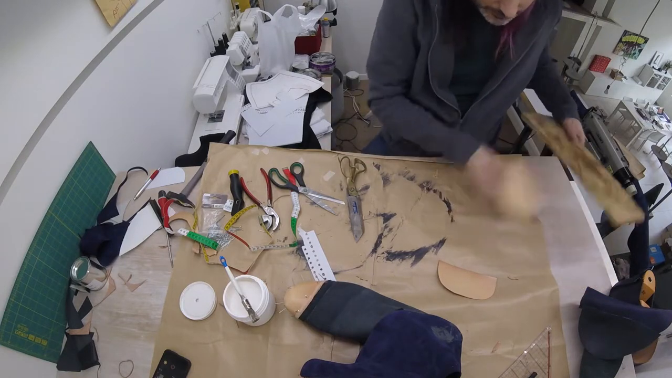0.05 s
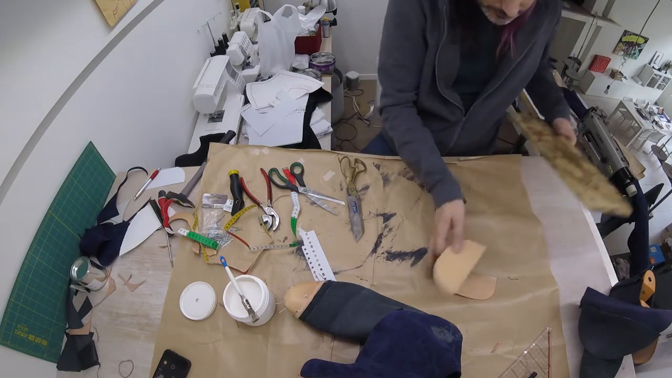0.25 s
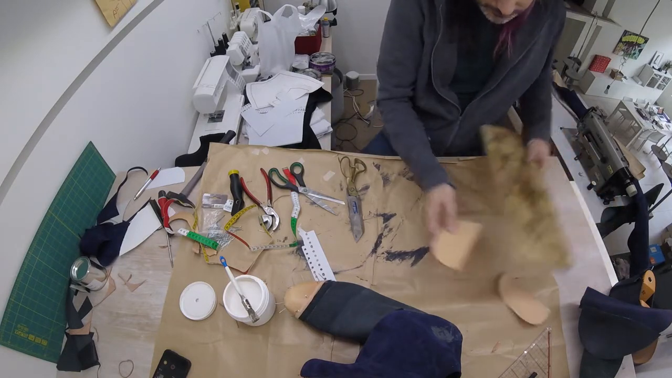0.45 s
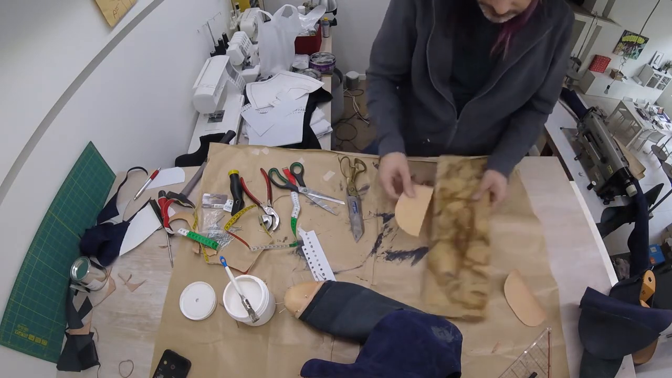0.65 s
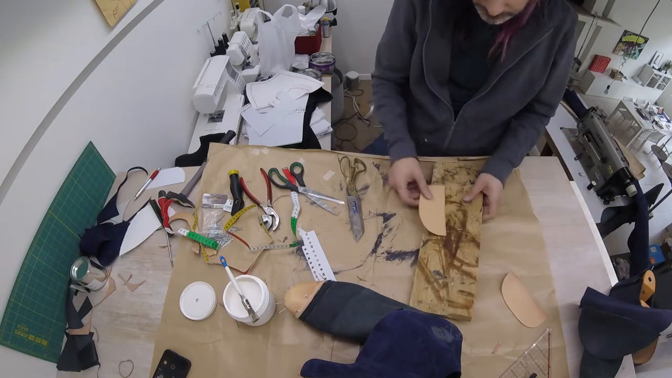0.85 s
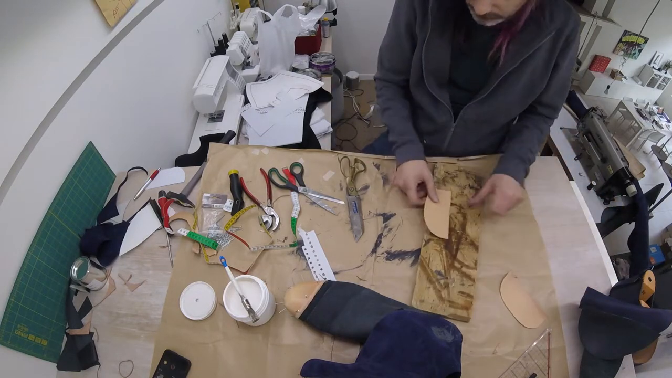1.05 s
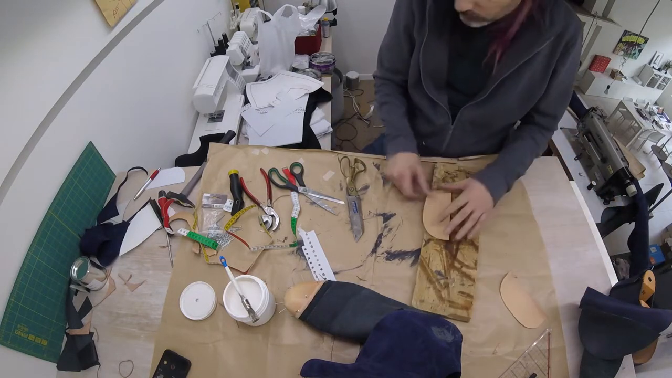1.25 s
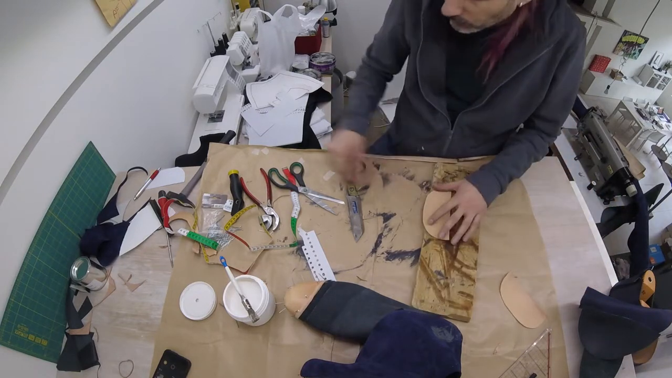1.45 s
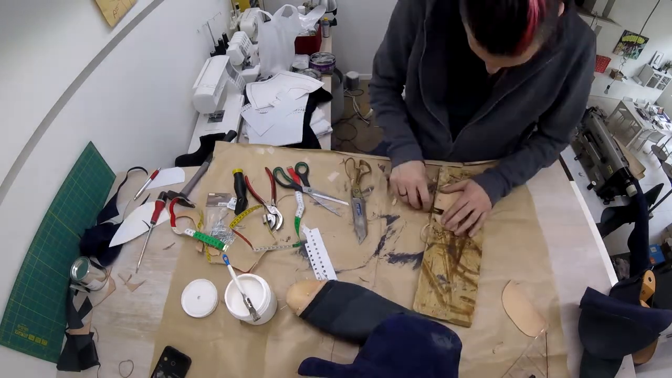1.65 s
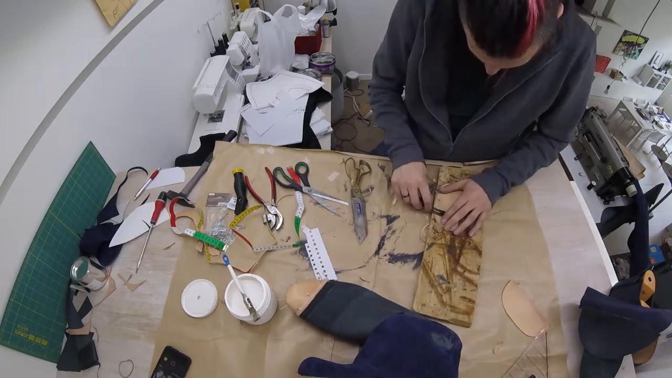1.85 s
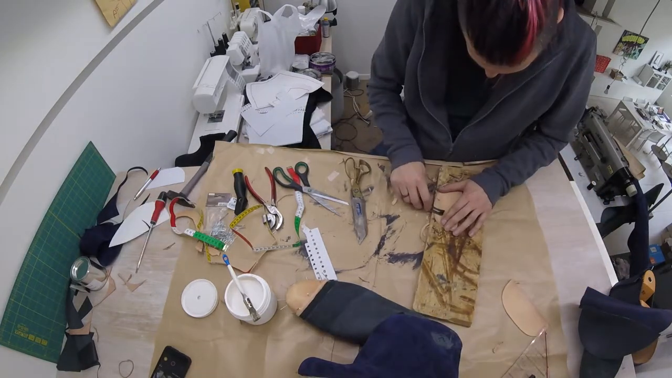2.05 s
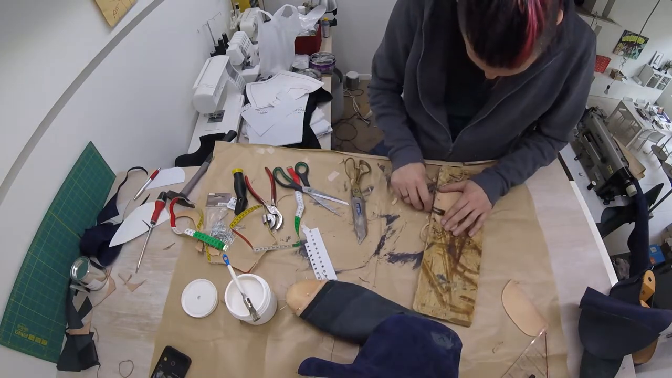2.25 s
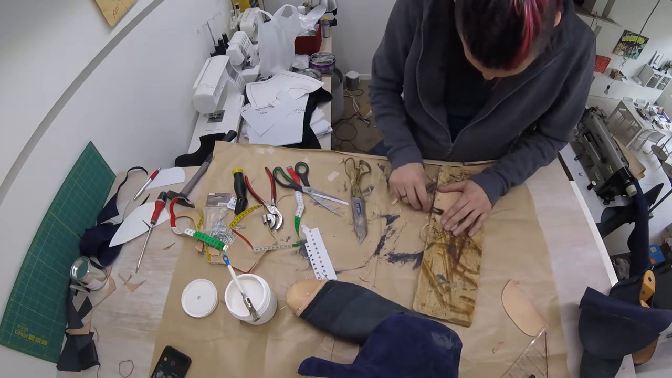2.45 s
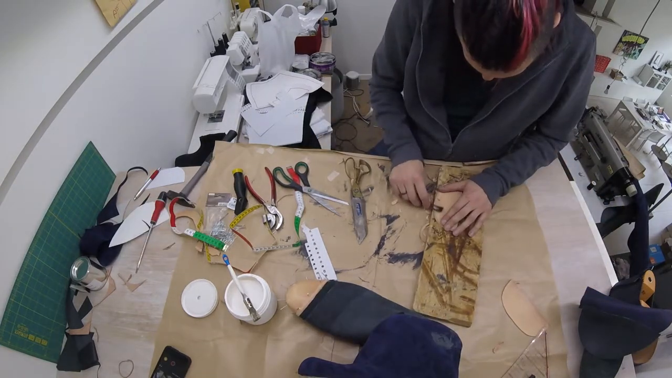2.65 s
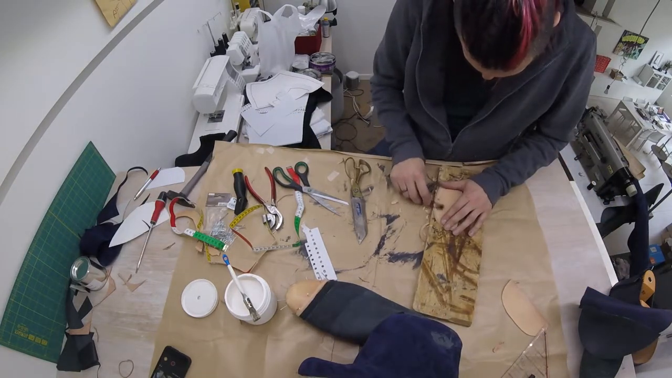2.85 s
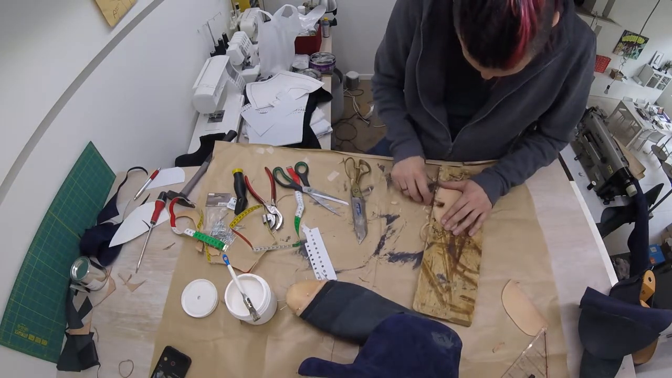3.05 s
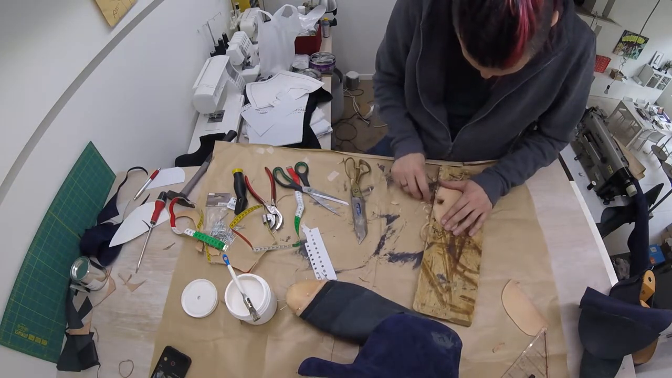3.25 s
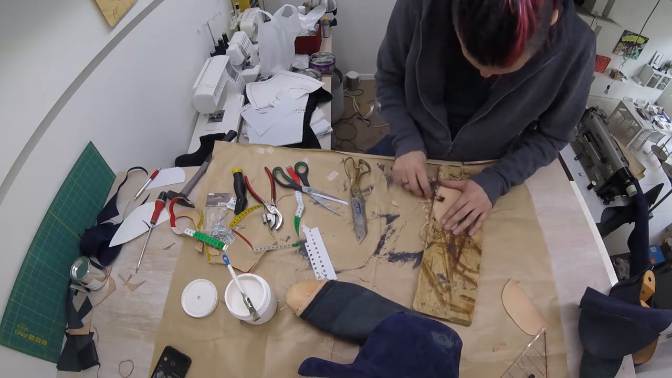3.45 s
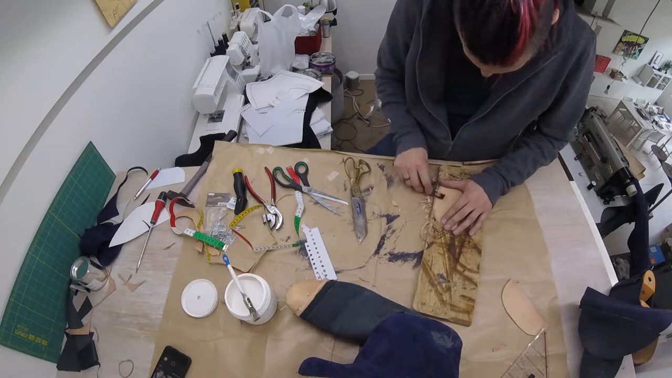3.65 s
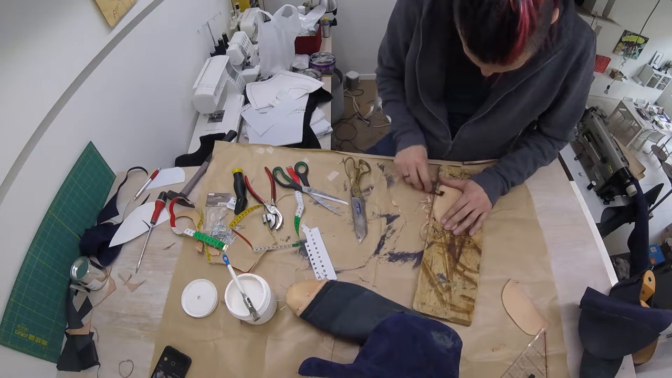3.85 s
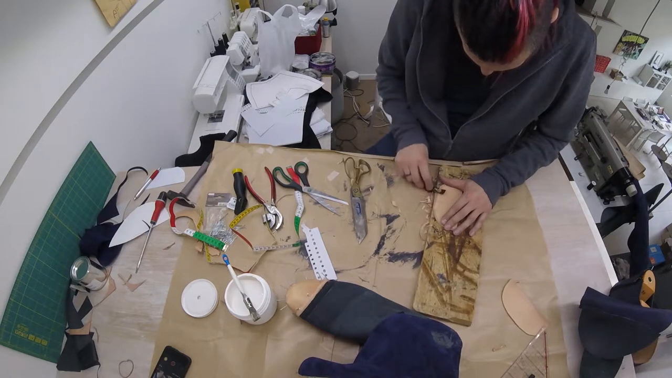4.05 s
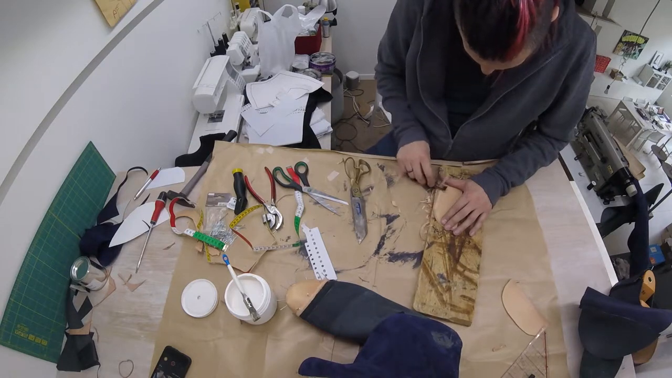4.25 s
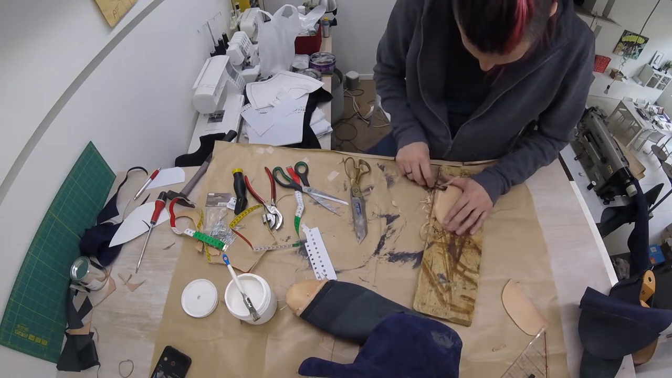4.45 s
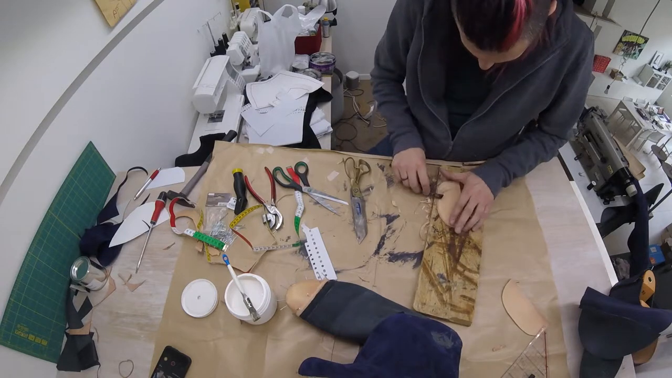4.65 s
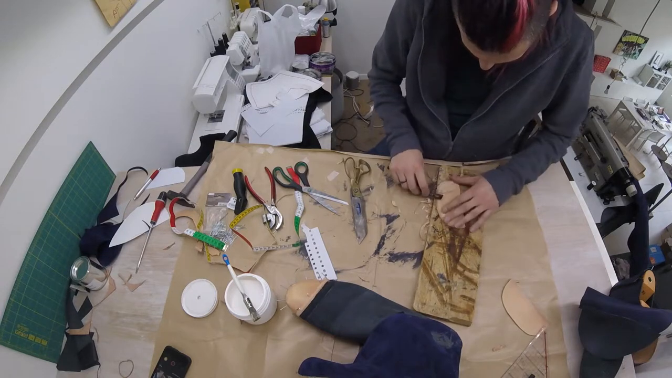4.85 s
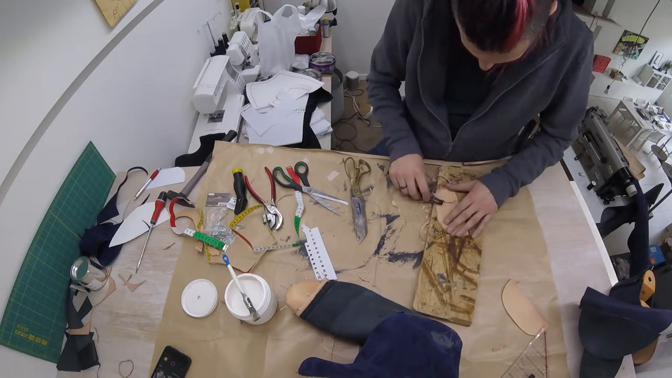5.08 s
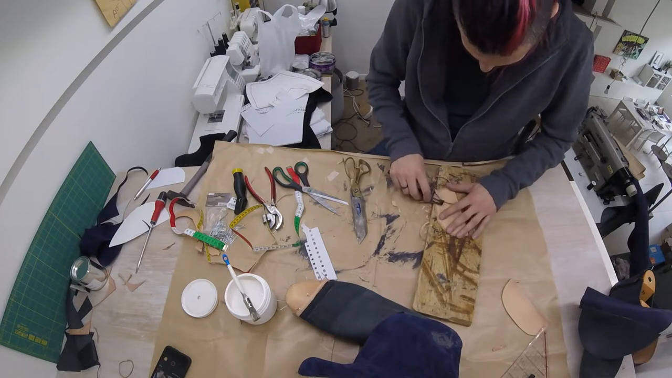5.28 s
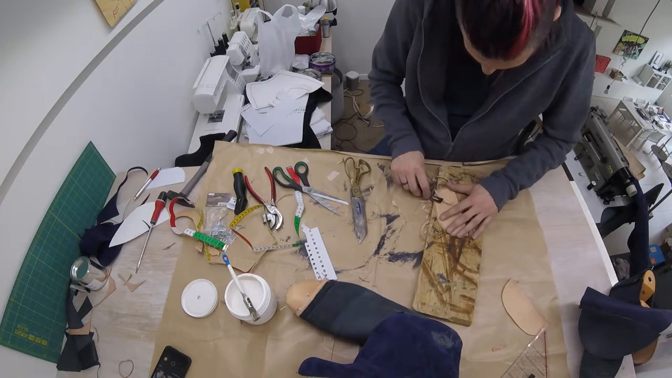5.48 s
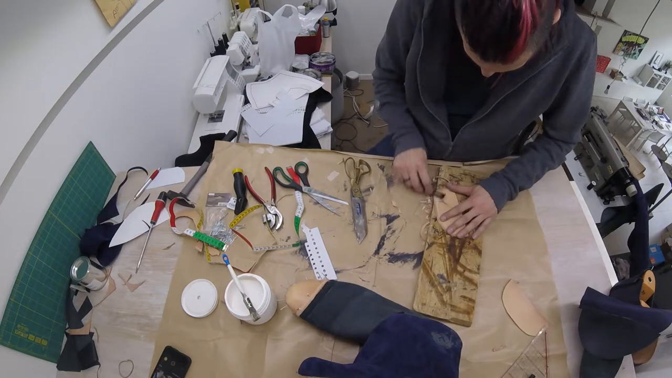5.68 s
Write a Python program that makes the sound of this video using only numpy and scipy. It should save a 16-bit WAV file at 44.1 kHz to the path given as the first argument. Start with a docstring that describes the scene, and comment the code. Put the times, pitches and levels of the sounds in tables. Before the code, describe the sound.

A wooden board brushes over paper and clatters onto a workbench among tools, then a knife skives leather in short raspy scrapes with little ticks.

```python
"""In a small workshop, a wooden board brushes over a paper-covered bench and clatters down among the tools.
Rubbing is made of tiny random snaps; blows ring the board, bench and steel tools as dying sine waves.
A knife then skives leather in quick short pushes: fibres snap as bursts of random clicks,
the blade judders as a train of uneven slips, and sharp contacts tick as short scattered clicks.
The bench rocks as low noise, over quiet room noise and a thin hiss; echoes surround the handwork."""
import sys
import numpy as np
from scipy import signal
from scipy.fft import rfft, irfft
from scipy.io import wavfile
from scipy.ndimage import uniform_filter1d

SR = 44100
rng = np.random.default_rng(int(sys.argv[2]) if len(sys.argv) > 2 else 0)


def pcm_store(signal):
    """Save signal as 16-bit PCM."""
    levels = np.round(np.clip(np.atleast_2d(signal), -1, 1) * 32767)
    wavfile.write(sys.argv[1], SR, levels.astype(np.int16).T)


N = 252252
TIME = np.arange(N) / SR

# All dB in the tables are relative: the functions scale each layer again.
# t60 is the time a sound takes to fall by 60 dB.

# blows of the landing board: [t/s, level/dB, treble limit (hardness) f/Hz, bench thump level/dB]
BOARD_BLOWS = [(0.8182, -12.5, 853, -31.5), (0.8251, -13.5, 951, -52), (0.836, -14.5, 592, -40),
               (.851, -17.5, 1000, -27), (0.8982, -9.5, 344, -40.5), (0.9006, -2.5, 381, -34.5),
               (0.9163, -10, 1380, -27.5), (.922, -12.5, 401, -20.5), (.931, -13, 892, -38.5),
               (.938, -12, 1010, -44), (0.944, -18, 600, -33.5), (0.999, -11, 5080, -27),
               (1.0046, -6.5, 2360, -36.5), (1.008, -11, 1793, -39.5), (1.017, -18, 1590, -38.5),
               (1.079, -23, 900, -38)]
# sharp ticks of board, tools and blade: [t/s, level/dB, centre of the colour f/Hz, t60/s]
SHARP_TICKS = [(.276, -31.5, 3000, 0.062), (0.2931, -17, 4000, 0.035), (0.3402, -28, 3470, 0.044),
               (.356, -31, 5930, 0.026), (.3895, -31.5, 2800, 0.046), (0.394, -22, 2600, 0.12),
               (0.483, -30.5, 2820, 0.16), (0.5698, -17, 4300, 0.017), (.6844, -20, 4130, .06),
               (.707, -23, 3210, .053), (0.8095, -31, 3500, 0.069), (0.9421, -23, 4750, 0.032),
               (0.9995, -18.5, 3860, 0.027), (1.9552, -23, 5870, 0.039), (1.966, -29, 3170, 0.12),
               (2.0764, -37, 3920, 0.034), (2.13, -24.5, 2280, 0.19), (2.1804, -30, 4270, 0.051),
               (2.2755, -31, 4300, 0.057), (2.3824, -23, 3080, 0.073), (2.4496, -30, 3800, 0.017),
               (2.473, -29, 4000, 0.044), (2.6474, -25, 3740, 0.027), (2.8033, -23.5, 3630, 0.064),
               (2.82, -28, 2400, 0.11), (2.908, -35.5, 4300, 0.035), (2.925, -23, 4020, 0.03),
               (3.0133, -21, 3780, 0.16), (3.04, -25.5, 3240, 0.048), (3.072, -27.5, 2950, 0.087),
               (3.1269, -23.5, 3100, 0.068), (3.15, -30.5, 2200, 0.031), (3.242, -25.5, 3730, .025),
               (3.328, -35.5, 4380, 0.04), (3.408, -27.5, 3770, .045), (3.426, -15.5, 3200, 0.052),
               (3.4836, -28, 2980, 0.094), (3.5525, -34, 3700, 0.13), (3.6165, -25, 3400, 0.027),
               (3.7098, -34, 3060, 0.062), (3.9453, -31, 4450, 0.039), (4.1791, -36, 3840, 0.072),
               (4.5583, -45.5, 3030, 0.048), (4.688, -49, 2400, .07), (5.5018, -34, 3740, 0.037),
               (5.563, -32.5, 2310, 0.075), (5.5906, -31.5, 4500, 0.044), (5.61, -29, 2750, 0.0545)]
# ringing tones of the wooden board: [f/Hz, level/dB, t60/s]
BOARD_MODES = [(252, -7, .22), (299, -7, .1), (358, -11, .07), (400, -8, .08), (504, -13, .2),
               (708, -6, .12), (852, -9, .11), (1105, -7, .09), (1400, -6.5, .09), (1636, -10, .09),
               (2052, -4, .08), (2290, -6, .08), (2530, -3.5, .07), (2680, -6, .09), (3050, -9, .06),
               (3482, -5, .07)]
# ringing tones of the bench: [f/Hz, level/dB, t60/s]
BENCH_MODES = [(72, -1.5, 0.26), (96, 3.5, 0.075), (138, -8.5, 0.094)]
# ringing tones of the steel tools lying on the bench: [f/Hz, level/dB, t60/s]
TOOL_MODES = [(1048, -4, .9), (1092, -5, .8), (1135, -1, 1.1), (1171, 0, 1.0), (1203, -1, 1.2),
              (1246, -3, 1.1), (1357, -5, .9), (1440, -8, 1.0), (2140, -7, .8), (2340, -8, .8),
              (2560, -8, .8)]
# resonances of board and blade that colour scrapes and ticks: [f/Hz, width/Hz, lift/dB]
BODY_RESONANCES = [(257, 60, 6.5), (365, 150, 4.5), (507, 60, 6), (695, 77, 5.5), (844, 72, 3),
                   (1118, 230, 6), (2135, 90, 5), (2600, 250, 2), (3690, 620, 10.5), (6420, 330, 15.5)]

# spectrum of the board's clack: [f/Hz, level/dB]
CLACK_SPECTRUM = [(60, -10.5), (150, -3), (280, 3), (450, -0.5), (900, -1), (1700, -3.5), (2500, 3),
                  (3600, -4), (4800, -16), (6500, -16), (8000, -34), (13000, -61.5)]
# spectrum of a hard tick: [f/Hz, level/dB]
TICK_SPECTRUM = [(100, -11.5), (600, -10.5), (1500, -5.5), (2400, 6), (3800, -5.5), (5200, -5.5),
                 (6600, -9), (7600, -16), (10000, -24.5), (11600, -22), (12300, -47.5), (13500, -62.5)]
# spectrum of snapping leather fibres: [f/Hz, level/dB]
FIBRE_SPECTRUM = [(60, -27), (200, -1), (450, -1.5), (900, 0), (1600, -9), (2500, 3.5), (3800, -10),
                  (5200, -7), (6600, -12), (7600, -13), (10000, -24.5), (11300, -19), (13500, -76)]
# spectrum of the blade's slips: [f/Hz, level/dB]
SLIP_SPECTRUM = [(100, -20.5), (300, -0.5), (450, -3), (700, 0), (1100, -6.5), (1600, -20.5), (2300, -4),
                 (2800, -6.5), (3600, -31), (8000, -42), (13000, -73)]
# spectrum of paper under the board: [f/Hz, level/dB]
PAPER_SPECTRUM = [(60, -14.5), (450, -4), (1000, -8.5), (1550, -8), (2050, -3.5), (2700, 3), (4000, -12),
                  (5200, -10.5), (6600, -12.5), (7800, -22), (10000, -31.5), (11600, -33.5), (12400, -55),
                  (13500, -75.5)]
# spectrum of the sliding hands: [f/Hz, level/dB]
HAND_SPECTRUM = [(60, 0), (150, 2), (330, -0.5), (700, -3.5), (1600, -9.5), (2500, -11.5), (4500, -23),
                 (7000, -21), (13000, -51)]
# spectrum of the rocking bench: [f/Hz, level/dB]
ROCKING_SPECTRUM = [(15, -7), (32, 1), (45, -11.5), (70, 8), (92, -7), (135, -5), (190, -32), (400, -78)]
# spectrum of the low room noise: [f/Hz, level/dB]
ROOM_NOISE_SPECTRUM = [(15, -16), (31, -1), (43, -5), (52, -5), (75, 3), (115, -14), (150, -16.5),
                       (200, -17), (250, -15), (300, -19.5), (700, -32), (1080, -28.5), (1800, -31.5),
                       (2350, -32.5), (4000, -44), (8000, -73.5)]
# spectrum of the thin high hiss: [f/Hz, level/dB]
HISS_SPECTRUM = [(500, -24.5), (3000, -22.5), (5000, -15.5), (5900, -7.5), (6500, 2.5), (7200, -5),
                 (9000, -8.5), (10500, -19.5), (12000, -15.5), (13800, -35)]
# how long the workshop's tail rings: [f/Hz, t60/s]
TAIL_T60 = [(70, 0.95), (250, 1.46), (600, 1.26), (1250, 1.41), (2300, 1.04), (4000, 0.98), (6500, 0.87),
            (12000, 0.27)]
# colour of the workshop's tail: [f/Hz, level/dB]
TAIL_COLOUR = [(60, -1), (250, -1), (400, -1), (520, -1), (750, -5), (1000, 1), (1190, 6.5), (1420, 1.5),
               (1750, -2), (2100, 2), (2500, 0), (3000, -3), (3500, 0), (5000, -4), (12000, -3)]

# pushes of the knife: [peak of the cut t/s, width/s, cut level/dB, judder earlier by t/s (negative: later),
# judder level/dB, slips per second, bench rocking level/dB]
KNIFE_PUSHES = [(1.955, 0.042, -45.5, 0.033, -47, 570, -46), (2.148, .022, -41.5, 0.012, -33.5, 610, -45),
                (2.184, 0.0099, -39.5, 0, -54, 580, -56), (2.368, 0.026, -38, .015, -36, 690, -36.5),
                (2.443, 0.016, -41, -0.0064, -41.5, 810, -57), (2.582, 0.022, -38.5, .015, -29, 694, -51),
                (2.65, .02, -41.5, -0.019, -43, 640, -39.5), (2.796, 0.018, -32.5, .035, -34.5, 760, -37.5),
                (2.859, 0.019, -44, -0.0037, -42.5, 650, -44), (3.008, .019, -34.5, 0.029, -29, 700, -37.5),
                (3.13, 0.01053, -42.5, 0, -41, 700, -44), (3.217, 0.019, -35, .031, -38, 680, -36.5),
                (3.315, .023, -48.5, -0.000097, -39, 800, -56),
                (3.428, .026, -36, 0.026, -40.5, 810, -36.5), (3.492, 0.012, -40.5, -0.019, -53, 790, -35),
                (3.561, .012, -43, 0.014, -46, 650, -44), (3.626, 0.023, -38, 0.016, -35, 596, -36.5),
                (3.72, .025, -56, -0.031, -46, 700, -44), (3.812, 0.016, -60, 0, -37, 660, -55),
                (3.843, 0.019, -37.5, -0.0084, -37.5, 684, -35.5),
                (3.953, .008, -38.5, 0.016, -51, 670, -37), (4.054, 0.02, -38.5, 0.0017, -34.5, 694, -35),
                (4.135, 0.017, -52, -.015, -44, 670, -48), (4.243, 0.0082, -42, .004, -34.5, 680, -56),
                (4.276, .017, -34, .001, -35.5, 730, -38.5), (4.609, .03, -50.5, 0.021, -68, 920, -61),
                (5.364, 0.017, -61, 0.01, -49.5, 490, -43), (5.474, 0.034, -44.5, 0.018, -39, 556, -44),
                (5.602, 0.015, -42, 0.013, -40, 650, -54), (5.681, 0.019, -39.5, -0.016, -34.5, 550, -43)]
# colour of the cut along the leather: [t/s, brightness/(dB per octave), lift of the nasal middle/dB]
CUT_COLOUR = [(1.93, -1.3, -4), (2.4, -1.5, 4.5), (2.6, -1, -1.5), (3.2, -1, 6), (3.5, -1.43, -2.5),
              (4.05, 2.4, 16.5), (4.28, 0.5, 11), (4.6, -4, -1), (5.5, -2.2, -13), (5.7, -1.5, -6)]
# how busy the hands are between pushes: [t/s, rubbing level/dB, bench rocking level/dB]
HAND_ACTIVITY = [(0, -57, -77), (.2, -64, -83), (1.6, -64.5, -73.5), (1.87, -69, -61.5), (1.97, -54.5, -49),
                 (2.9, -48.5, -52), (3.3, -58, -46), (3.9, -51, -52), (4.2, -51, -46.5), (4.36, -62, -49),
                 (4.66, -58.5, -67), (4.8, -68.5, -71), (5.2, -63, -57), (5.4, -61, -56), (5.56, -51, -50),
                 (5.72, -51, -36.5)]
# the board drags on the paper, and later shifts a little: [peak t/s, rise/s, fall/s, level/dB]
BOARD_DRAGS = [(.273, 0.0026, .01, -43), (.301, 0.007, .013, -37), (.345, 0.015, .02, -41),
               (.405, 0.02, 0.056, -42), (.564, 0.0091, 0.032, -42.5), (0.675, 0.0051, .006, -37.5),
               (.693, 0.0086, 0.021, -21), (.75, 0.0306, 0.067, -35), (.903, 0.011, .016, -34),
               (.985, 0.0045, 0.0093, -36), (1.001, 0.0059, .013, -28), (5.04, 0.073, 0.055, -62.5)]

# size of a tick's first click against its scatter
DIRECT = .5
# the hand slides with each push: width, delay, level against the table's cut level
SLIDE_S, SLIDE_LAG_S, SLIDE_DB = 0.04, 0.045, -18
# faint stray ticks wherever something slides: average rate, level
STRAY_PER_S, STRAY_DB = 70, -10
# the background dips for a while: start, end, time to sink, time to return, depth
DIP_FROM_S, DIP_TO_S, DIP_SINK_S, DIP_RETURN_S, DIP_DB = 1, 1.7, .07, 0.054, -8
# share of the rise that a cut takes to fall, and width and delay of the bench's answer
FALL_SHARE, ROCK_S, ROCK_LAG_S = 0.92, .028, 0.0026
# a judder lasts longer in a longer push: base width, added share of the cut's width, most width
JUDDER_S, JUDDER_SHARE, JUDDER_MOST_S = .004, .48, .018
# upper edge of the whole sound
EDGE_HZ = 13900


def amp(db):
    """Turns decibels into gain."""
    return 10 ** (np.asarray(db) / 20)


def unit(x):
    """Scales a signal to an rms of 1."""
    return x / np.sqrt(np.mean(x ** 2) + 1e-20)


def read(points, hz):
    """Reads a table between its points, on a log-frequency axis."""
    f, value = np.transpose(points)
    return np.interp(np.log(hz + 1), np.log(f + 1), value)


def curve(rows, column):
    """Draws one column of a table as a curve with a value for every sample."""
    rows = np.array(rows)
    return np.interp(TIME, rows[:, 0], rows[:, column])


def add(mix, s, sound):
    """Mixes a sound in at time s."""
    part = mix[max(round(s * SR), 0):][:len(sound)]
    part += sound[:len(part)]


def colour(x, db_of, size=4096):
    """Filters forward in time with a unit-energy filter shaped like db_of(Hz)."""
    hz = abs(np.fft.fftfreq(size, 1 / SR))
    log_gain = np.log(amp(db_of(hz)) + 1e-5)
    # minimum phase: the filter answers as early as it can
    response = np.exp(np.conj(signal.hilbert(log_gain)))
    taps = np.fft.ifft(response).real
    return signal.fftconvolve(x, taps / np.linalg.norm(taps))[:len(x)]


def noise(spectrum):
    """Makes steady noise with a given spectrum."""
    gain = amp(read(spectrum, np.fft.rfftfreq(N, 1 / SR)))
    return unit(irfft(rfft(rng.standard_normal(N)) * gain, N))


def grains(count, per_s, spread_db):
    """Makes tiny snaps at random times, with random signs and sizes."""
    size = amp(spread_db * np.minimum(rng.exponential(1, count), 4))
    sign = rng.choice([-1, 1], count)
    happens = rng.random(count) < per_s / SR
    return unit(size * sign * happens)


def push(rise, fall):
    """Makes one bell-shaped swell of force that peaks 3 rise times after its start."""
    t = np.arange(-3 * rise, 3 * fall + .02, 1 / SR)
    return np.exp(-(t / np.where(t < 0, rise, fall)) ** 2 / 2)


def swell(s, rise, fall):
    """Places a swell of force that peaks at time s in a signal as long as the scene."""
    out = np.zeros(N)
    add(out, s - 3 * rise, push(rise, fall))
    return out


def burst(t, t60, direct):
    """Makes a click and the dense dying scatter that follows it, of unit energy."""
    scatter = rng.standard_normal(len(t)) * 10 ** (-3 * t / t60)
    scatter /= np.linalg.norm(scatter)
    scatter[0] += direct
    return scatter / np.linalg.norm(scatter)


def ring(modes, t):
    """Sums the dying sines of a struck object."""
    return sum(amp(db) * 10 ** (-3 * t / t60) * np.sin(2 * np.pi * hz * t) for hz, db, t60 in modes)


def body(hz):
    """Gives the lift in dB from the resonances of board and blade."""
    return sum(db / (1 + (2 * (hz - f) / width) ** 2) for f, width, db in BODY_RESONANCES)


def ripple(hz, depth_db):
    """Gives chance peaks and dips in dB that change with the place of contact."""
    knots = np.geomspace(200, 12000, num=30)
    return depth_db * np.interp(hz, knots, rng.standard_normal(len(knots)))


def tick_colour(hz, centre_hz):
    """Gives the spectrum in dB of a hard contact, favouring the range around its centre."""
    octaves_away = np.log2((hz + 1) / centre_hz)
    return read(TICK_SPECTRUM, hz) + 0.77 * body(hz) - 6 * np.minimum(octaves_away ** 2, 2)


def background():
    """Low room noise and a thin high hiss, both steady noise, dip together for a while."""
    sinking = (TIME - DIP_FROM_S) / DIP_SINK_S
    returning = (DIP_TO_S - TIME) / DIP_RETURN_S
    dip = np.clip(np.minimum(sinking, returning), 0, 1)
    steady = amp(-54.5) * noise(ROOM_NOISE_SPECTRUM) + amp(-67.5) * noise(HISS_SPECTRUM)
    return steady * amp(DIP_DB * dip)


def rocking():
    """The bench sways as low noise under the leaning hands, and more with each push."""
    sway = noise(ROCKING_SPECTRUM)
    # evens out the noise's own swings, so that the hands set the level
    swing = np.sqrt(uniform_filter1d(sway ** 2, size=1500) + 1e-6)
    pushes = sum((amp(db) * swell(s + ROCK_LAG_S, ROCK_S, ROCK_S)) ** 2 for s, *_, db in KNIFE_PUSHES)
    force = np.sqrt(pushes + amp(curve(HAND_ACTIVITY, 2)) ** 2)
    return amp(-2.5) * sway / swing * force


def rubbing(stray_hz=2600):
    """Tiny snaps make crackly paper under the board, softer sliding hands and stray ticks from both."""
    drag = np.sqrt(sum((amp(db) * swell(s, rise, fall)) ** 2 for s, rise, fall, db in BOARD_DRAGS))
    pushes = sum((amp(db + SLIDE_DB) * swell(s + SLIDE_LAG_S, SLIDE_S, SLIDE_S)) ** 2
                 for s, _, db, *_ in KNIFE_PUSHES)
    slide = np.sqrt(pushes + amp(curve(HAND_ACTIVITY, 1)) ** 2)

    paper_snaps = drag * grains(N, per_s=2500, spread_db=-0.5)
    paper = colour(paper_snaps, lambda hz: read(PAPER_SPECTRUM, hz) + 0.67 * body(hz))
    hand_snaps = slide * grains(N, per_s=3000, spread_db=3.5)
    hands = colour(hand_snaps, lambda hz: read(HAND_SPECTRUM, hz) + 0.73 * body(hz))

    stray_clicks = (slide + amp(-4) * drag) * grains(N, per_s=STRAY_PER_S, spread_db=2.5)
    stray = colour(stray_clicks, lambda hz: tick_colour(hz, stray_hz))
    scatter = burst(np.arange(SR // 10) / SR, t60=.04, direct=0.97)
    stray = signal.fftconvolve(stray, scatter)[:N]
    return amp(-2) * paper + amp(-2.0) * hands + amp(STRAY_DB) * stray


def ticks():
    """Short hard contacts click and scatter, each with its own band of colour."""
    out, t = np.zeros(N), np.arange(SR // 6) / SR
    for s, db, centre_hz, t60 in SHARP_TICKS:
        tick = colour(burst(t, t60, DIRECT), lambda hz: tick_colour(hz, centre_hz))
        add(out, s, amp(db + 16) * tick)
    return out


def knocks():
    """Each blow rings the board, thumps the bench and shakes the tools; soft blows lack the treble."""
    out, t, long_t = np.zeros(N), np.arange(SR // 2) / SR, np.arange(SR) / SR
    bench = ring(BENCH_MODES, t)
    # neighbouring modes move in opposite directions at the struck edge
    wood = ring(BOARD_MODES[::2], t) - ring(BOARD_MODES[1::2], t)
    for s, db, hard_hz, thump_db in BOARD_BLOWS:
        clack = colour(burst(t, t60=0.0492, direct=0.16), lambda hz: read(CLACK_SPECTRUM, hz))
        blow = amp(-18.5) * wood + amp(15.0) * clack
        # every blow shakes each tool mode by a different chance amount
        steel = sum(rng.standard_normal() * ring([mode], long_t) for mode in TOOL_MODES)
        soft = signal.butter(2, min(hard_hz, SR / 3), fs=SR)
        add(out, s, amp(db + 4) * signal.lfilter(*soft, blow) + amp(thump_db) * bench)
        add(out, s, amp(db - 43.5) * signal.lfilter(*soft, steel))
    return signal.sosfilt(signal.butter(2, 35, "high", fs=SR, output="sos"), out)


def cuts(hollow_hz=1380):
    """Fibres snap one after another as the edge passes through; the colour drifts along the leather."""
    out = np.zeros(N)
    when, brights, hollows = np.transpose(CUT_COLOUR)
    for s, rise, db, *_ in KNIFE_PUSHES:
        bright, hollow_db = np.interp(s, when, brights), np.interp(s, when, hollows)
        force = push(rise, FALL_SHARE * rise)
        snaps = force * grains(SR // 2, per_s=2200, spread_db=4.5)[:len(force)]
        # the force alone sets the energy, however many snaps fall in it
        snaps *= np.linalg.norm(force) / (np.linalg.norm(snaps) + 1e-9)

        def cut_colour(hz):
            tilt = bright * np.log2(np.maximum(hz, 500) / 2500)
            nasal = hollow_db / (1 + ((hz - hollow_hz) / 280) ** 2)
            return read(FIBRE_SPECTRUM, hz) + body(hz) + ripple(hz, depth_db=2) + tilt + nasal

        add(out, s - 3 * rise, amp(db) * colour(snaps, cut_colour))
    return out


def judders(lift_db=4.0):
    """The blade sticks and slips at an unsteady rate near its own resonance: a short hoarse croak."""
    out = np.zeros(N)
    # unsteadiness of the rate, unevenness of the slips, width of the resonance
    wander, uneven, width_hz = .2, .5, 330
    for s, rise, _, lead, db, slip_hz, _ in KNIFE_PUSHES:
        width = min(JUDDER_S + JUDDER_SHARE * rise, JUDDER_MOST_S)
        force = push(width, width)
        drift, size = rng.standard_normal((2, SR // 2))[:, :len(force)]
        rate = slip_hz * np.exp(wander * unit(uniform_filter1d(drift, size=60)))
        turns = np.cumsum(rate) / SR
        # one slip each time the count of turns reaches a whole number
        slips = np.diff(np.floor(turns), prepend=0) * np.exp(uneven * size)

        def croak_colour(hz):
            blade = lift_db / (1 + (2 * (hz - slip_hz) / width_hz) ** 2)
            return read(SLIP_SPECTRUM, hz) + 1.7 * body(hz) + blade + ripple(hz, depth_db=3.5)

        croak = force * colour(slips - slips.mean(), croak_colour)
        croak *= np.linalg.norm(force) / np.linalg.norm(croak)
        add(out, s - lead - 3 * width, amp(db) * croak)
    return out


def workshop(x):
    """Adds quick reflections from bench and walls, and a faint long tail that fades by pitch."""
    t = np.arange(SR) / SR
    signs = rng.choice([-1., 1.], (2, SR))
    near, far = signs * (rng.random((2, SR)) < 3000 / SR) * (t > .002)
    near *= amp(-60 * t / 0.073)
    hz, age, z = signal.stft(far, SR, nperseg=256)
    fade = amp(read(TAIL_COLOUR, hz)[:, None] - 60 * age / read(TAIL_T60, hz)[:, None])
    far = signal.istft(z * fade, SR, nperseg=256)[1][:SR]
    echoes = amp(-8.5) * near / np.linalg.norm(near) + amp(-20.5) * far / np.linalg.norm(far)
    return x + signal.fftconvolve(x, echoes)[:N]


def scene():
    """Mixes the work and its echoes with the rocking bench and the background."""
    work = knocks() + ticks() + amp(-3) * cuts() + amp(-4.0) * judders() + rubbing()
    return (workshop(work) + rocking() + background())[None]


def record(dry):
    """Softens both ends, then removes the treble above the upper edge."""
    ends = np.clip(np.minimum(TIME, TIME[-1] - TIME) / .003, 0, 1)
    low_pass = signal.firwin(401, EDGE_HZ, window=("kaiser", 8), fs=SR)
    return signal.oaconvolve(dry * ends, low_pass[None], "same")


dry = scene()
out = record(dry)
pcm_store(out)
```